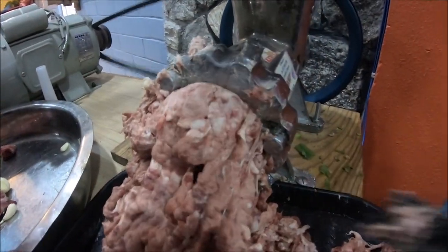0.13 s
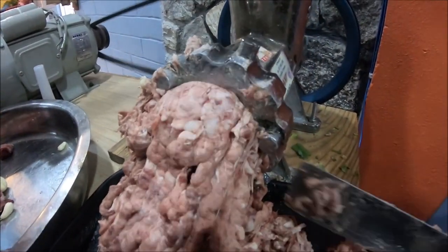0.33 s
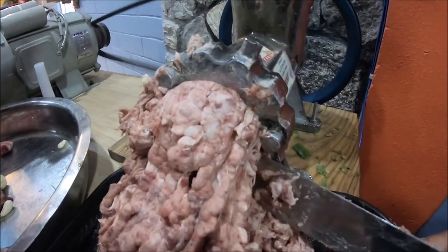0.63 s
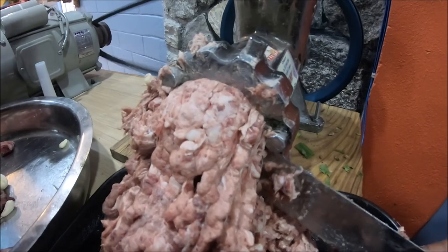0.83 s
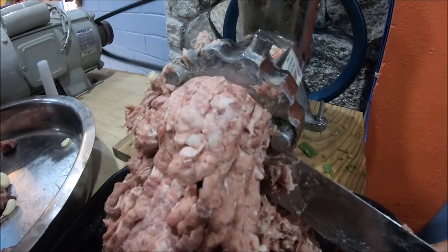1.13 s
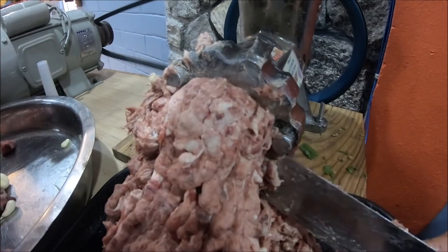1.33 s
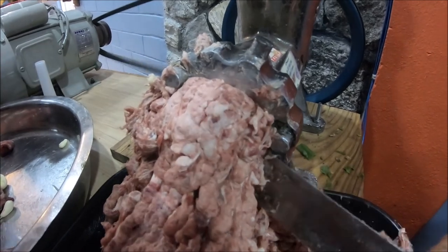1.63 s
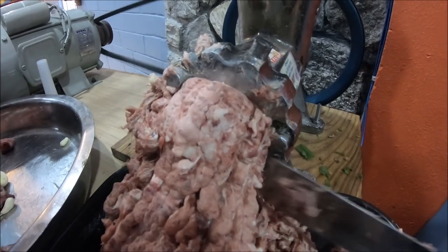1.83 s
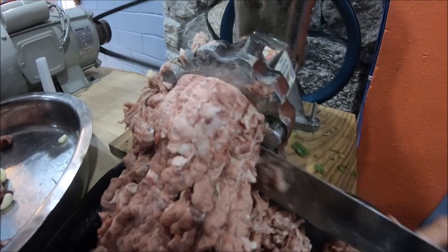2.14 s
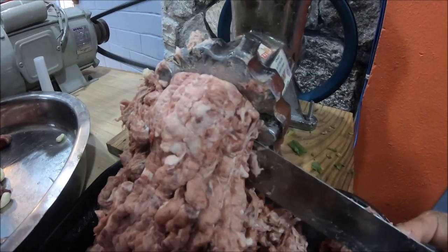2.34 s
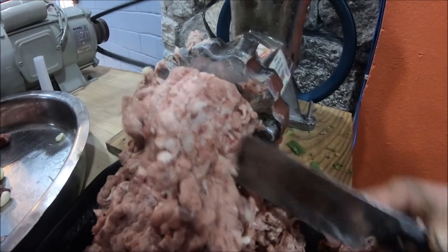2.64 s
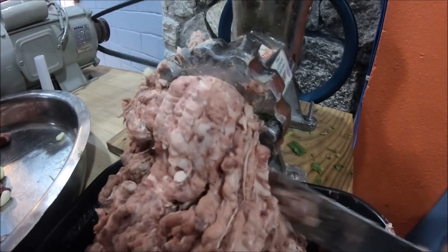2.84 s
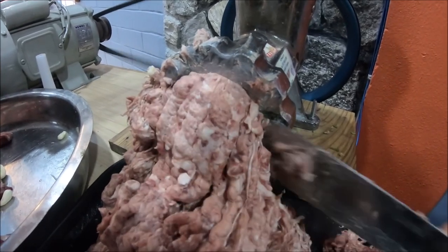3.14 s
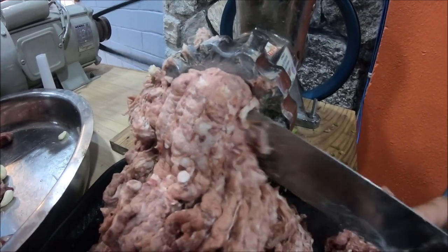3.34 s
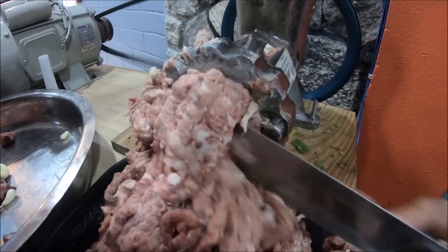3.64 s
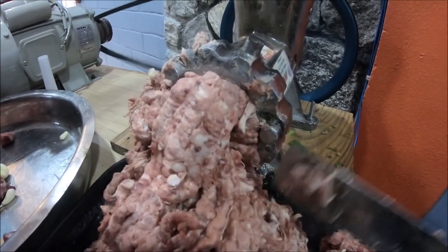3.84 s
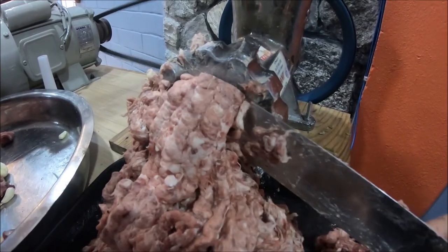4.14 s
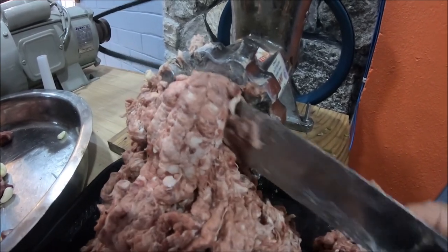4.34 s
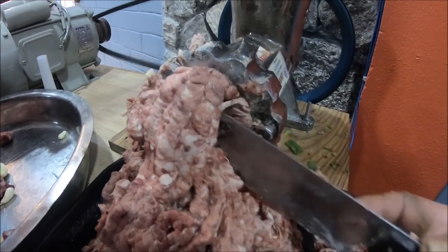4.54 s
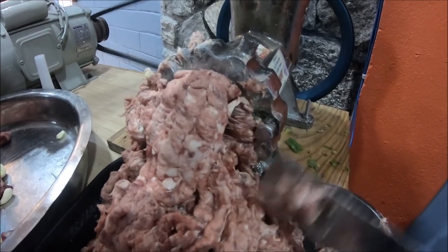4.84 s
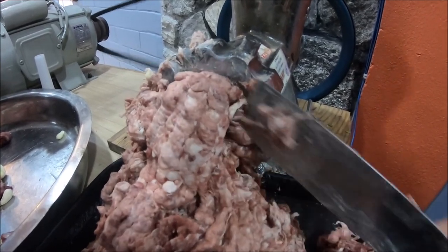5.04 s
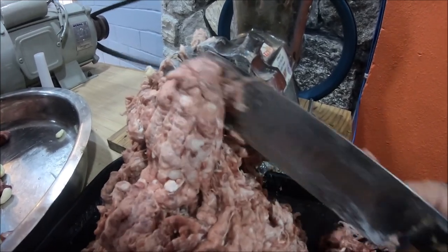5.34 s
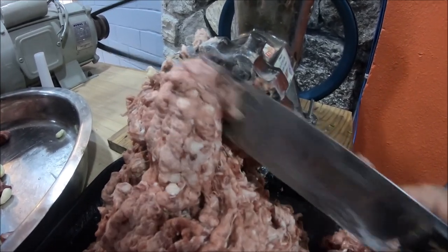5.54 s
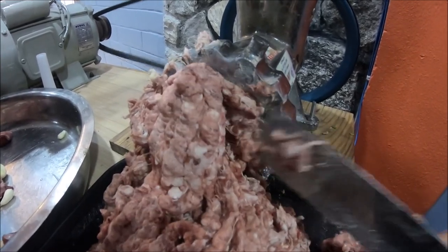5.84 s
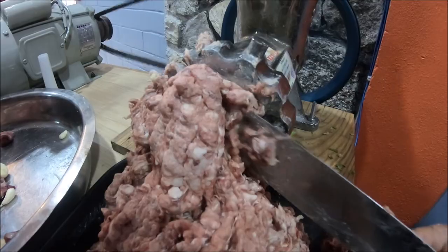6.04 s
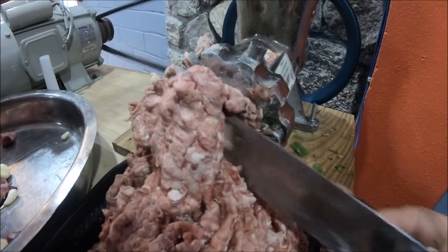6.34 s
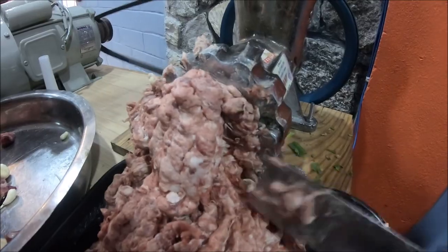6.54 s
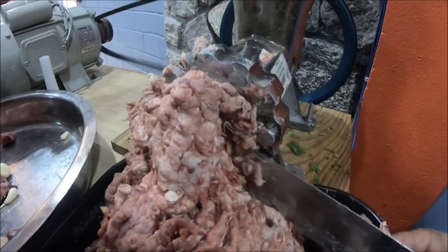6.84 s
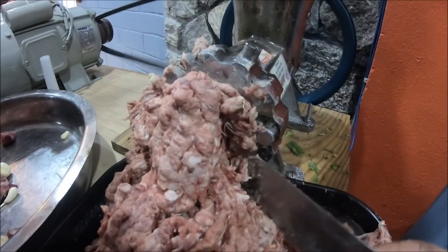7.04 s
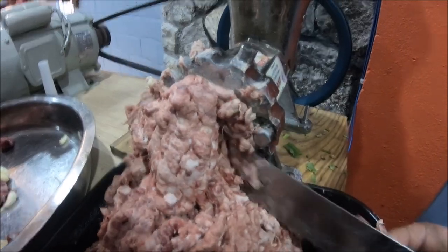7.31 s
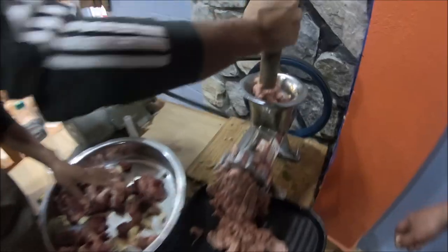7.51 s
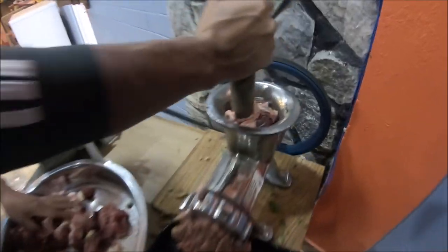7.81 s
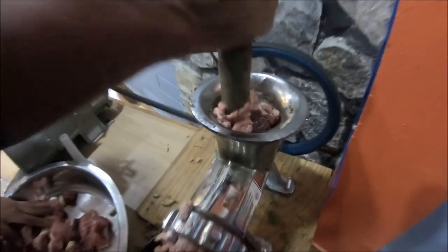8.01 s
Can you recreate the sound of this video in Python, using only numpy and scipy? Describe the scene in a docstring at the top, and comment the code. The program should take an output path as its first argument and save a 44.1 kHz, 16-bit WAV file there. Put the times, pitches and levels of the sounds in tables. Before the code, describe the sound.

For about 8.2 seconds, a belt-driven meat grinder runs close by in a food stall. A loud, deep hum near 100 Hz dominates, fluttering about seven times a second as the belt tugs, thumps the hollow housing and gives a breathy, gritty swish. The wooden table booms unevenly, gears grind, bearings ring faintly and gristle rasps. Small wet crackles and squelches are scattered throughout; soft smacks come around 0.3, 1.6, 5.75 and 6.7-7.0 s. Dull tray knocks fall near 0.2, 0.7, 3.75 and 5.3 s, strongest at 5.7 s. A knife clicks and briefly rings on the right at 5.8 and 6.65-6.7 s, with a light tap at 7.0. Low rumble swells from 7.1 s; at 7.43 a hard snap nearly silences everything for 0.03 s, then the machine returns with a dull thud, its rhythm shifted and its tone slightly changed, running to the end.

```python
"""A steady low hum runs throughout: a belt-driven meat grinder on a wooden table in a food stall, close by. The
motor hums at twice the mains rate. About seven times a second the belt completes a lap, tugs at the hum, thumps
the frame and swishes; this is made from sines, dying rings and coloured noise. Mince crackles and smacks in
short bursts of noise, dull knocks come from the tray and the pusher, and later a ringing knife clicks on the
outlet. Near the end the sound snaps off, almost vanishes for an instant and returns with a thud."""
import sys
import numpy as np
from scipy import signal
from scipy.fft import rfft, irfft, next_fast_len
from scipy.io import wavfile
from scipy.ndimage import uniform_filter1d, minimum_filter1d

SR = 44100
rng = np.random.default_rng(int(sys.argv[2]) if len(sys.argv) > 2 else 0)


def unload_audio(sound):
    """Save the sound as a 16-bit wav file, at the path given as the first command line argument."""
    columns = np.transpose(np.atleast_2d(sound))
    # keep every value between -1 and 1, then stretch to whole-number steps
    steps = np.round(np.clip(columns, -1, 1) * 32767)
    wavfile.write(sys.argv[1], SR, steps.astype(np.int16))


N = 360297
TIME = np.arange(N) / SR
FFT_SIZE = next_fast_len(N, True)
FREQS = np.maximum(np.arange(FFT_SIZE // 2 + 1) * SR / FFT_SIZE, 1)  # at least 1 Hz, so logs work


def from_db(db):
    """Decibels to gain."""
    return 10 ** (np.asarray(db) / 20)


def rms_one(x):
    """Scale to an average strength (rms) of 1."""
    return x / np.sqrt(np.mean(x ** 2) + 1e-20)


def columns_at(rows, where, scale=np.asarray):
    """Read every column of a table, joined by straight lines along its first one."""
    first, *columns = np.transpose(rows)
    return [np.interp(scale(where), scale(first), column) for column in columns]


def level_at(rows):
    """The second column of a table over time."""
    return columns_at(rows, TIME)[0]


def drift(rate):
    """Smooth chance wandering with about `rate` turns a second; spread 1."""
    step = 40  # samples between slow values
    r = np.exp(-2 * np.pi * step * rate / SR)
    white = rng.standard_normal(N // step + 2002)
    slow = signal.lfilter([1], [1, -2 * r, r * r], white)[2000:]  # leave out the filter's start
    return np.interp(np.arange(N) / step, np.arange(len(slow)), rms_one(slow))


def colour(points):
    """Gain per frequency of a short spectrum, falling steeply past its last point."""
    gain = from_db(columns_at(points, FREQS, np.log)[0])
    return gain * np.minimum(points[-1][0] / FREQS, 1) ** 2


def resonances(modes):
    """Gain per frequency of steep-sided resonances; each level sets the power of a whole mode."""
    return sum(from_db(db) / np.sqrt(width) / (1 + ((FREQS - hz) / width) ** 2)
               for hz, width, db in modes)


def metal_ripple(depth_db, count=300):
    """Random peaks and dips per frequency, like the many narrow modes of the cast body."""
    peaks = rng.uniform(-1, 1, count)
    return from_db(depth_db * np.interp(FREQS, np.linspace(0, SR / 2, count), peaks))


# how the two microphone ports hear each pitch:
# f/Hz, likeness (0-1), lead of the left (radians), left minus right level/dB
PORTS = [(34.8, 1, 0.15, 14), (76.4, 0.91, 0.17, -2), (200, 1, 0.11, -0.5), (320, 0.96, 0.28, -1.5),
         (383, 0.97, 0.13, 6), (490, .85, 1.95, -6), (680, 0.95, 1.65, -3.5), (940, 0.94, 1.75, 0.5),
         (2110, 0.6, 1.26, 3), (2760, 0.9, 1.27, 0), (4430, 0.69, 0.087, 0.5), (8250, 0.2, 1.5, -0.5),
         (13100, 1, 0.36, 0)]


def port_gains(hz):
    """Complex gain of the left and right port: a difference in level and in phase."""
    alike, lead, balance_db = columns_at(PORTS, np.atleast_1d(hz), np.log)
    left = from_db(balance_db / 2) * np.exp(.5j * lead)
    return np.array([left, 1 / left])


def noise(gain):
    """Stereo noise of a given colour: a part shared by the ports and a separate part in each; rms 1."""
    alike = np.clip(columns_at(PORTS, FREQS, np.log)[0], 0, 1)
    white = rng.standard_normal((3, 2 * len(FREQS))).view(complex)
    both = np.sqrt(alike) * white[0] + np.sqrt(1 - alike) * white[1:]
    return rms_one(irfft(both * port_gains(FREQS) * gain, FFT_SIZE)[:, :N])


def tone(hz, wave):
    """Turn a complex wave into a stereo tone; a wave of size 1 gives about rms 1."""
    return np.sqrt(2) * (port_gains(hz) * wave).real


def driven(modes, evenness):
    """Resonances under a steady drive: they ring more evenly than chance alone would make them."""
    x = noise(resonances(modes))
    power = uniform_filter1d(np.mean(x ** 2, axis=0), size=1500)
    return rms_one(x / (power + 0.13) ** (evenness / 2))


def gritty(gain, per_s, low_hz, high_hz, length_s, glide):
    """Friction noise of a given colour, part of it short squeaks that slide in pitch; rms 1."""
    chances = rng.random((int(per_s * N / SR), 6))
    when, pitch, size, slide, left, right = chances.T[:, :, None]
    age = np.arange(int(length_s * SR))
    along = age / len(age)
    hz = low_hz + (high_hz - low_hz) * pitch
    turns = hz * age / SR * (1 + glide * (slide - .5) * along) + left
    shape = np.sqrt(-np.log(size)) * np.sin(np.pi * np.sqrt(along)) ** 2
    places = ((when * N).astype(int) + age).ravel()
    # the less alike the ports, the further apart the two phases
    apart = (1 - columns_at(PORTS, hz, np.log)[0]) * (2 * right - 1)
    squeaks = []
    for lead in (0, apart):
        waves = shape * np.sin(2 * np.pi * (turns + lead))
        squeaks.append(np.bincount(places, waves.ravel())[:N])
    spectrum = rfft(squeaks, FFT_SIZE) * gain * port_gains(FREQS)
    squeaks = rms_one(irfft(spectrum, FFT_SIZE)[:, :N])
    return rms_one(from_db(-4) * squeaks + noise(gain))


def strikes(events, scatter_db):
    """One impulse per event, its level scattered by chance."""
    times, level_db = np.transpose(events)
    out = np.zeros(N)
    out[np.round(times * SR).astype(int)] = from_db(level_db + scatter_db * rng.standard_normal(len(times)))
    return out + 1e-18  # keeps the filters away from slow, tiny numbers


def dying(events, t60, attack_s=.0002):
    """An envelope that rises quickly at each event, then falls by 60 dB in t60 seconds."""
    blows = strikes(events, scatter_db=0)
    fall = signal.lfilter([1], [1, -from_db(-60 / (t60 * SR))], blows)
    r = np.exp(-1 / (attack_s * SR))
    return signal.lfilter([1 - r], [1, -r], fall)


def ring(blows, hz, t60):
    """Each blow starts a sine that dies by 60 dB in t60 seconds."""
    r, w = from_db(-60 / (t60 * SR)), 2 * np.pi * hz / SR
    return signal.lfilter([0, np.sin(w)], [1, -2 * r * np.cos(w), r * r], blows)


def random_bursts(per_s, base_db, spread_db):
    """Events at random times, most of them near the lowest level."""
    place, size = rng.random((int(per_s * N / SR), 2)).T
    return np.c_[place * TIME[-1], base_db + spread_db * np.minimum(-np.log(size), 2)]


# speed of the belt, which sags a little under load: t/s, speed (laps per s)
BELT_SPEED = [(0, 7.253), (1.2, 7.127), (2.6, 7.246), (3.5, 7.104), (5.2, 7.167), (5.95, 7.395),
              (6.9, 7.045), (7.43, 7.181)]
# the instant when the sound drops out: start t/s, end t/s
DROPOUT = (7.434, 7.466)
AFTER_DROPOUT = TIME > DROPOUT[0]  # from here on the microphone has moved back
FIRST_LAP, SKIPPED_LAP = -.227, .48  # place at the start and jump at the dropout (laps)


def belt_position():
    """Laps run so far, part of one being skipped at the dropout; whole numbers fall on the swishes."""
    return FIRST_LAP + np.cumsum(level_at(BELT_SPEED)) / SR + SKIPPED_LAP * AFTER_DROPOUT


def once_a_lap(lap, centre, sharpness):
    """A smooth bump of height 1 at one place of each lap."""
    return np.exp(sharpness * (np.cos(2 * np.pi * (lap - centre)) - 1))


def lap_to_lap(lap):
    """A new chance value for each lap, joined by straight lines; spread about 1."""
    laps = np.arange(-1, lap[-1] + 1)
    return np.interp(lap, laps, rng.standard_normal(len(laps)))


def belt_texture(lap, depth_db, count=30):
    """Worn spots along the belt give the same fast, uneven grip on every lap."""
    orders = np.arange(count // 3, count)
    place = np.linspace(0, 1, 1024)
    waves = np.cos(2 * np.pi * (np.outer(place, orders) + rng.random(len(orders))))
    spots = rms_one(waves @ rng.rayleigh(1, len(orders)))
    return rms_one(from_db(depth_db * np.interp(lap % 1, place, spots)))


MAINS_HUM_HZ, HUM_DB = 99.72, -15.6
# side tones around the hum, most from the belt's tug; order 5 stands for a separate tone near 136 Hz:
# order (distance from the hum, times the lap rate), level/dB against the hum
TUG = [(-2, -16.5), (-1, -18), (1, -20), (2, -26), (3, -18), (4, -24), (5, -17), (6, -26)]


def motor_hum(lap, tug_place=0.744, level_share=0.67):
    """The motor's mains hum, swayed in level and phase by its side tones, most from the belt's tug."""
    pull = 1
    for order, db in TUG:
        sign = (-1) ** min(order, 0)  # odd lower side tones are inverted: the tug also bends the phase
        strength = from_db(db) * (1 + .35 * drift(2))
        pull = pull - sign * strength * np.exp(2j * np.pi * order * (lap - tug_place))
    phase = 2 * np.pi * MAINS_HUM_HZ * TIME + np.angle(pull)
    return from_db(HUM_DB) * tone(MAINS_HUM_HZ, np.abs(pull) ** level_share * np.exp(1j * phase))


# magnetic buzz of the motor: multiple of the hum, level/dB
BUZZ = [(2, -51), (5, -65), (7, -50.5)]


def motor_buzz(lap):
    """Magnetic buzz near multiples of the hum, its phase swayed by chance and by the belt."""
    out = 0
    for order, db in BUZZ:
        slip_hz = 0 if order < 6 else 8.3  # rotor slip lowers the slot tone
        hz = order * MAINS_HUM_HZ - slip_hz
        sway = .3 * drift(0.97) + .1 * order * np.sin(2 * np.pi * lap)
        out = out + from_db(db) * tone(hz, np.exp(1j * (2 * np.pi * hz * TIME + sway)))
    return out


# tones of shaft, pulleys and bearings: f/Hz, level/dB,
# change of level/dB once the microphone has moved back, after the dropout
WHIRL = [(44.0, -48, 0), (49.1, -44, 0), (51.4, -44, 0), (73.4, -39, 0), (124.3, -35, -7), (172.3, -47, 0),
         (424, -58, 0), (764, -65, 13), (789, -54, 3), (889, -55, -2), (1261, -61, -4), (1281, -63, -7),
         (1299, -63, -7)]


def turning_parts(wander=0.93):
    """Shaft, pulleys and bearings each give a steady tone with a slowly wandering phase."""
    out = 0
    for hz, db, change_db in WHIRL:
        wave = np.exp(1j * (2 * np.pi * hz * TIME + wander * drift(2.2)))
        out = out + from_db(db + change_db * AFTER_DROPOUT) * tone(hz, wave)
    return out


# strength of the thumps, with the effort of the screw: t/s, level/dB
THUMP_LEVEL = [(0, -29.5), (.6, -28), (1.05, -24), (1.5, -27), (1.75, -25), (2.3, -28.5), (3.25, -28),
               (3.5, -24), (4.0, -28), (4.3, -25.5), (4.65, -28), (5.4, -28), (5.75, -24.5), (6.25, -30.5),
               (6.7, -26), (7.25, -30), (7.65, -24), (8.17, -28)]
# where in its lap the thump starts, shifting with the load: t/s, place (laps)
THUMP_PLACE = [(0, -.03), (1.3, -.02), (2.2, -.06), (3.1, .05), (3.6, -.03), (4.5, -.01), (5.1, -.12),
               (5.8, -.13), (6.4, .02), (7.25, .03), (7.8, -.11), (8.17, -.02)]
# resonances of the housing: f/Hz, width (Hz), relative level/dB
HOUSING_MODES = [(331.4, 18, -3.5), (363, 21, -3), (380, 4.4, -10)]
THUMP_HZ, THUMP_SPREAD_HZ, THUMP_SPREAD_DB = 344, 7, .9
THUMP_ATTACK_S, THUMP_T60_S = 0.014, 0.25


def housing_thumps(lap):
    """Once a lap the belt jerks the housing, which rings down at a new pitch over its steady ringing."""
    thump_lap = lap - level_at(THUMP_PLACE)
    starts = np.interp(np.arange(int(lap[-1]) + 1), thump_lap, TIME)
    age = TIME[:SR // 3]
    shape = (1 - np.exp(-(age / THUMP_ATTACK_S) ** 2)) * from_db(-60 * age / THUMP_T60_S)
    wave = np.zeros(N + len(age), complex)
    chances = rng.standard_normal((len(starts), 2))
    for start, (size, tune) in zip((starts * SR).astype(int), chances):
        hz = THUMP_HZ + THUMP_SPREAD_HZ * tune
        thump = shape * np.exp(2j * np.pi * hz * age)
        wave[start:start + len(age)] += from_db(THUMP_SPREAD_DB * size) * thump
    thumps = from_db(level_at(THUMP_LEVEL)) * tone(THUMP_HZ, wave[:N])
    return thumps + from_db(-44) * driven(HOUSING_MODES, evenness=0.31)


# level of the table's boom: t/s, level/dB at the height of each lap's swell
BOOM_LEVEL = [(0, -41), (.3, -31.5), (.62, -36.5), (.8, -25.5), (.98, -38.5), (1.2, -30), (1.42, -27),
              (1.72, -37.5), (1.9, -28), (2.35, -35), (2.85, -37.5), (3.08, -27.5), (3.4, -36.5),
              (3.7, -29.5), (4.3, -35), (5.4, -34.5), (5.72, -30.5), (6.29, -31), (6.56, -40.5),
              (6.84, -28), (7.26, -41), (7.48, -27.5), (7.7, -27.5), (8.17, -32.5)]
# resonances of the table: f/Hz, width (Hz), relative level/dB
TABLE_MODES = [(258.6, 4.5, 7), (267, 20, -3.5), (279, 5.3, -9.5)]


def table_boom(lap):
    """The wooden table resonates, swelling once a lap."""
    swell = once_a_lap(lap, .23, 0.42)
    return from_db(level_at(BOOM_LEVEL)) * swell * driven(TABLE_MODES, evenness=0.35)


# load of the meat on the screw, heard as shaking of the stand: t/s, level/dB
LOAD = [(0.0, -29), (0.45, -25), (1.56, -26), (1.84, -20.5), (2.25, -29.5), (2.53, -22.5), (4.62, -31.5),
        (6.01, -26), (6.29, -35.5), (7.26, -17.5), (7.54, -34.5), (8.17, -22)]
# colour of the shaking: f/Hz, relative level/dB
SHAKE = [(55, -17.5), (75, 7.5), (95, 7), (125, 7.5), (140, 10.5), (155, -6.5), (185, -8), (235, -17),
         (310, -10.5), (450, -28.5), (600, -60)]


def stand_shake():
    """The load shakes the stand: low noise that follows the load."""
    return from_db(level_at(LOAD)) * noise(colour(SHAKE))


# resonances of the gears: f/Hz, width (Hz), relative level/dB
GEAR_MODES = [(670.5, 41, 5.5), (831, 37, 0), (1024, 73, -2.5), (1282, 57, -5), (1534, 74, -8.5),
              (1715, 49, -12.5)]
GEARS_DB, GEARS_MOVED_DB = -46.5, -0.5  # base level; change once the microphone has moved back


def gears(lap):
    """Gears grind grittily through their resonances, straining once a lap."""
    strain_db = 3.4 * once_a_lap(lap, 0.044, 2.3) + 2.0 * drift(4.9)
    level = from_db(GEARS_DB + strain_db + GEARS_MOVED_DB * AFTER_DROPOUT)
    grind = gritty(resonances(GEAR_MODES), per_s=410, low_hz=556, high_hz=1786, length_s=.022, glide=0.037)
    return level * belt_texture(lap, depth_db=2.2) * grind


# base level of the belt's swish: t/s, level/dB
SWISH_LEVEL = [(0.0, -49), (0.3, -47.5), (0.7, -49.5), (1.0, -48), (1.3, -46), (1.55, -45.5), (2.25, -49.5),
               (2.67, -44.5), (3.05, -46), (3.3, -52.5), (3.78, -43), (4.22, -45), (4.56, -43),
               (5.0, -48.5), (5.6, -45), (6.7, -45.5), (7.0, -50), (7.5, -44.5), (8.17, -42)]
# how far the rubbing falls while the belt is slack, less when the screw labours: t/s, drop of level/dB
SLACK_DROP = [(0, 13), (.6, 13), (.85, 5), (1.3, 8), (1.5, 12), (2.0, 13), (2.3, 7), (2.5, 11), (3.0, 9),
              (3.25, 6), (3.55, 17), (4.9, 15), (5.1, 11), (5.7, 15), (6.5, 13), (7.25, 7), (7.6, 14),
              (8.17, 11)]
# colour of the swish: f/Hz, relative level/dB
SWISH = [(900, -5), (2000, 3.5), (2600, 7), (3400, 2), (4400, -4.5), (5500, 0), (6400, 3), (8200, -0.5),
         (9200, -9), (10600, -12), (11400, -20.5), (14300, -26), (15000, -39.5)]
# resonances of the pulleys: f/Hz, width (Hz), relative level/dB
PULLEY_MODES = [(6000, 36, 6), (6660, 60, -3), (7730, 150, -3.5), (8480, 60, -9), (9730, 180, -6)]
SWISH_SPREAD_DB, SLACK_SPREAD_DB = .5, 1.2  # no two laps are alike
GRAB_DB, GRAB_SPREAD_DB = 3, 1.2  # brief grab of the belt at the height of each swish


def belt(lap):
    """The belt rubs in the pulley grooves and goes slack once a lap; the metal rings faintly with it."""
    swish_db = level_at(SWISH_LEVEL) + SWISH_SPREAD_DB * lap_to_lap(lap)
    slack = np.clip(1.33 * once_a_lap(lap, 0.49, 0.64), 0, 1)
    drop_db = (level_at(SLACK_DROP) + SLACK_SPREAD_DB * lap_to_lap(lap)) * slack
    grab_db = (GRAB_DB + GRAB_SPREAD_DB * lap_to_lap(lap)) * (once_a_lap(lap, .02, 5) - .4)
    stick_slip_db = 1.3 * drift(60) + .7 * drift(14)
    grip = from_db(swish_db + grab_db - drop_db + stick_slip_db) * belt_texture(lap, depth_db=1.96)
    gain = colour(SWISH) * metal_ripple(depth_db=3.5) + from_db(18.0) * resonances(PULLEY_MODES)
    return grip * gritty(gain, per_s=1000, low_hz=3496, high_hz=10530, length_s=0.0095, glide=.02)


# narrow, wavering rings of screw and bearings: f/Hz, width (Hz), relative level/dB
BEARING_MODES = [(1548, 9, 0), (1683, 8, -0.5), (1880, 8, -3.5), (2334, 15, 2), (2640, 17, -2.5),
                 (3196, 12, -0.5), (3410, 12, -6)]
BEARINGS_DB = -63


def bearings(lap):
    """Screw and bearings ring unsteadily, a little louder at each swish."""
    sway_db = 2.5 * drift(5) + 3 * (once_a_lap(lap, 0, 1) - .5)
    return from_db(BEARINGS_DB + sway_db) * driven(BEARING_MODES, evenness=.3)


# colour of a rasp: f/Hz, relative level/dB
RASP = [(700, -12), (1100, 0.5), (1600, 0), (2000, -3), (2600, -2), (3400, -5), (4400, -12), (8000, -21.5),
        (11000, -36)]
RASPS_PER_S, RASP_DB, RASP_SPREAD_DB, RASP_T60_S = 36, -62, 3.2, .06


def gristle_rasps(lap):
    """Gristle catching on the cutter gives short, uneven rasps, stronger while the belt pulls."""
    catches = random_bursts(RASPS_PER_S, RASP_DB, RASP_SPREAD_DB)
    pull = .45 + .55 * once_a_lap(lap, .03, 1.5)
    return pull * dying(catches, t60=RASP_T60_S) * noise(colour(RASP) * metal_ripple(depth_db=5))


# low rumble, swelling as the microphone is moved: t/s, level/dB
RUMBLE_DB = [(0, -47.5), (7.1, -48), (7.3, -22), (7.43, -28.5), (7.5, -30), (8.17, -54)]
# colour of the rumble: f/Hz, relative level/dB
RUMBLE = [(12, -7), (26, 5.5), (38, 4.5), (52, 1.5), (85, 9), (200, -52)]


def rumble():
    """Very low noise that follows its level table."""
    return from_db(level_at(RUMBLE_DB)) * noise(colour(RUMBLE))


# colour of the stall's background: f/Hz, relative level/dB
STALL = [(200, 10), (450, 3.5), (800, 1), (1150, -12.5), (2050, -15.5), (2500, -14), (3400, -18),
         (4300, -26), (8000, -53)]


def stall():
    """The steady background noise of the food stall."""
    return from_db(-40.0) * noise(colour(STALL) * metal_ripple(depth_db=3))


# louder squelches: air pockets popping out of the mince, and from 2.292 s on mostly gristle catching on the
# cutter: t/s, relative level/dB
POPS = [(0.5796, -34.5), (0.7637, -47), (0.788, -35.5), (0.828, -40), (1.1463, -38), (1.2401, -39),
        (1.77, -34.5), (2.292, -44), (2.328, -39), (2.379, -53), (2.69, -35), (3.7878, -35), (3.942, -40),
        (4.17, -37), (4.634, -35), (4.787, -37), (5.165, -37), (6.172, -33), (7.14, -33), (7.245, -46),
        (7.298, -37)]
# colour of all the pops: f/Hz, relative level/dB
CRACKLE = [(1200, -16.5), (2600, 1.5), (4400, -6), (6200, 3), (8500, 0.5), (11000, -16), (15000, -31)]
CRACKLES_PER_S, CRACKLE_DB, CRACKLE_SPREAD_DB = 30, -66.5, 3  # the faint pops
SQUELCH_ATTACK_S, SQUELCH_T60_S = .004, .06


def crackles():
    """Air pockets pop wetly in the mince: many faint ones at random, and some louder squelches, several of them
    gristle catching on the cutter."""
    faint = dying(random_bursts(CRACKLES_PER_S, CRACKLE_DB, CRACKLE_SPREAD_DB), t60=.03)
    squelches = from_db(-8.5) * dying(POPS, SQUELCH_T60_S, SQUELCH_ATTACK_S)
    return (faint + squelches) * noise(colour(CRACKLE) * metal_ripple(depth_db=7))


# dull knocks on the tray, one at 7.895 from the pusher in the funnel, and at 7.471 the thud as the sound
# returns: t/s, relative level/dB
KNOCKS = [(0.215, -35.5), (0.2215, -33), (0.709, -38), (3.7495, -36), (5.304, -37), (5.7005, -25.5),
          (5.7065, -34), (5.73, -38), (5.76, -38.5), (6.507, -34.5), (7.008, -34.5), (7.471, -33),
          (7.895, -34.5)]
# colour of a knock or thud: f/Hz, relative level/dB
DULL = [(120, 3), (350, 15), (570, 2), (900, 9), (1800, -11.5), (3000, -20.5), (8000, -46.5)]


def knocks_and_thud():
    """Each knock on the tray or from the pusher, and the thud, is a dull noise burst and a soft push that rings
    like the table."""
    bursts = from_db(4.0) * dying(KNOCKS, t60=0.062) * noise(colour(DULL))
    soften = signal.butter(2, 600, fs=SR, output="sos")
    push = signal.sosfilt(soften, strikes(KNOCKS, scatter_db=0))
    return bursts + from_db(4) * ring(push, TABLE_MODES[0][0], t60=.18)


# wet smacks of the mince: t/s, relative level/dB
SMACKS = [(0.260, -54.5), (1.6055, -50.5), (1.695, -50.5), (5.754, -52), (6.745, -49.5), (6.9815, -47.5)]
# colour of a smack: f/Hz, relative level/dB
SMACK = [(700, -20), (1600, -3), (3000, 0.5), (4500, -14), (8000, -11), (11000, -22.5), (15000, -44)]


def mince_smacks():
    """The mince smacks wetly: short bursts of noise with a softened start."""
    return from_db(10.5) * dying(SMACKS, t60=0.045, attack_s=.002) * noise(colour(SMACK))


# knife on the steel outlet: t/s, relative level/dB,
# f/Hz of an added ring, set by where the blade touches
CLICKS = [(5.8035, -31, 2740), (5.8055, -33.5, 9280), (5.8085, -38, 4200), (6.643, -32, 3478),
          (6.6455, -36, 6400), (6.6485, -37, 7612), (6.707, -40.5, 3140), (6.7165, -41.5, 2740)]
# a light tap of the blade that only rings: t/s, relative level/dB, f/Hz
TAPS = [(6.9825, -43, 3150)]
# ways the blade rings: f/Hz, relative level/dB, t60 (s)
KNIFE_MODES = [(2277, -23, .06), (2837, -24, .04), (3537, -23, .05), (4200, -15, .025), (5300, -12.5, .037),
               (6400, -11.5, .036), (7047, -13, .045), (7612, -12, .045), (9280, -7.5, .032),
               (11300, -18, .02)]
# colour of the blade's crack: f/Hz, relative level/dB
CRACK = [(1200, -10), (2600, 1), (6500, -1), (9500, 2), (12000, -7), (15000, -19)]
KNIFE_PAN_DB = -9  # left minus right: the knife works on the right


def knife():
    """The blade cracks against the outlet and rings briefly, damped by the meat."""
    touches = [row[:2] for row in CLICKS]
    crack = from_db(-5.5) * dying(touches, t60=0.022) + from_db(-24) * dying(touches, t60=0.13)
    out = crack * noise(colour(CRACK))
    for hz, db, t60 in KNIFE_MODES:
        blows = np.array([strikes(touches, scatter_db=2.5) for side in range(2)])
        out += from_db(db) * ring(blows, hz, t60)
    for s, db, hz in CLICKS + TAPS:
        out += from_db(-6) * ring(strikes([(s, db)], scatter_db=0), hz, t60=0.052)
    return out * from_db([[KNIFE_PAN_DB / 2], [-KNIFE_PAN_DB / 2]])


def scene():
    """Machine, mince, knocks and knife over the steady noise and rumble of the stall."""
    lap = belt_position()
    motor = motor_hum(lap) + motor_buzz(lap) + turning_parts()
    frame = housing_thumps(lap) + table_boom(lap) + stand_shake() + gears(lap)
    machine = motor + frame + belt(lap) + bearings(lap) + gristle_rasps(lap)
    mince = crackles() + mince_smacks()
    return machine + rumble() + stall() + mince + knocks_and_thud() + knife()


# the snap as the sound breaks off: t/s, relative level/dB
SNAP = [(7.434, -15)]
# colour of the snap: f/Hz, relative level/dB
SNAP_COLOUR = [(300, 9), (1400, 18), (5000, -8), (15000, -25)]


def breaking_snap():
    """A burst of noise and a one-sided pulse that dies within milliseconds."""
    burst = from_db(-24.5) * dying(SNAP, t60=0.073) * noise(colour(SNAP_COLOUR))
    pulse = signal.lfilter([1], [1, -from_db(-60 / (.003 * SR))], strikes(SNAP, scatter_db=0))
    return burst - pulse


def limiter(x, ceiling_db, release_db_per_s):
    """Peaks above the ceiling pull the gain down just in time; it then recovers steadily."""
    over_db = np.maximum(20 * np.log10(np.abs(x).max(axis=0) + 1e-9) - ceiling_db, 0)
    release_db = release_db_per_s * TIME
    held_db = np.maximum.accumulate(over_db + release_db) - release_db
    lowest_db = minimum_filter1d(-held_db, size=220)
    return x * from_db(uniform_filter1d(lowest_db, size=220))


def record(dry):
    """The sound breaks off with a snap and fades back; a limiter holds the peaks; the top is cut."""
    start, end = DROPOUT
    passed = np.interp(TIME, [start, start + 1 / SR, end, end + .003], [1, .02, .02, 1])
    held = limiter(dry * passed + breaking_snap(), ceiling_db=-8.2, release_db_per_s=200)
    top_cut = signal.cheby2(12, 70, 16500, fs=SR, output="sos")  # little is left above 16500 Hz
    return signal.sosfilt(top_cut, held)


dry = scene()
out = record(dry)
unload_audio(out)
```